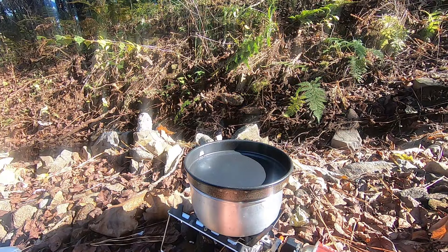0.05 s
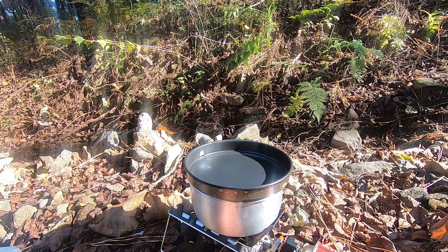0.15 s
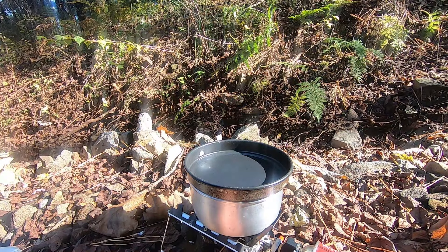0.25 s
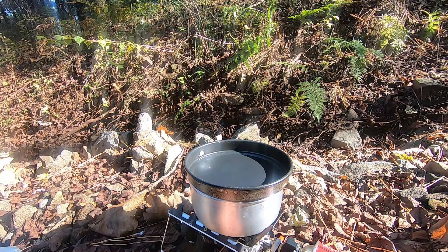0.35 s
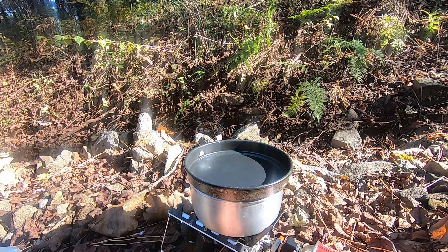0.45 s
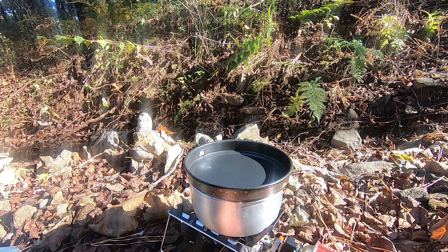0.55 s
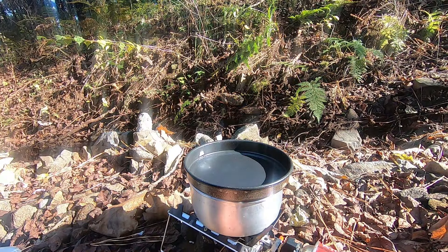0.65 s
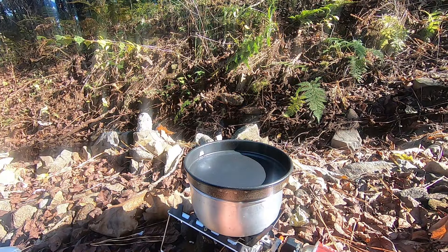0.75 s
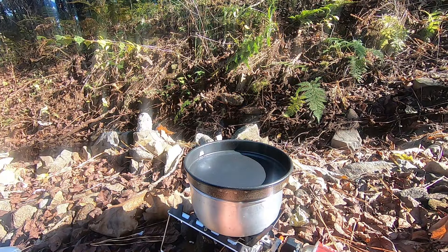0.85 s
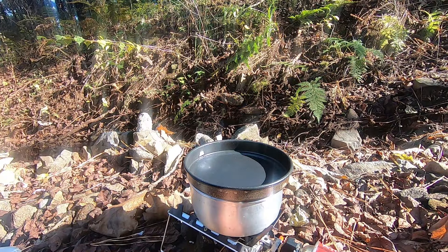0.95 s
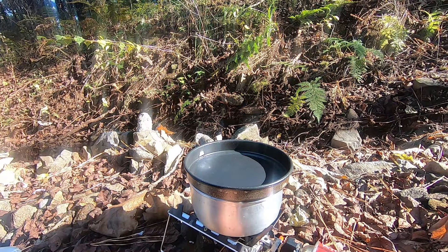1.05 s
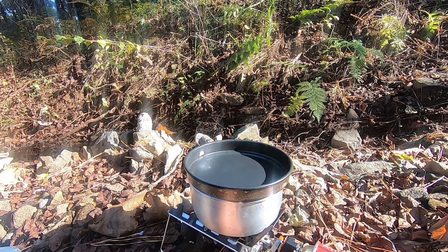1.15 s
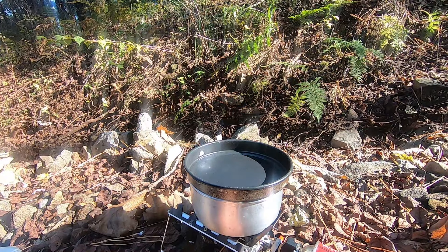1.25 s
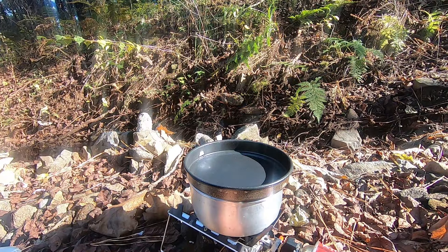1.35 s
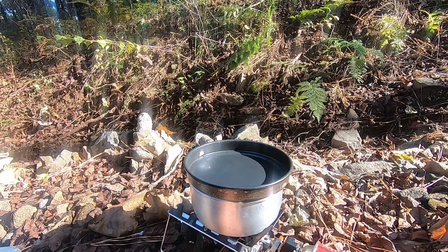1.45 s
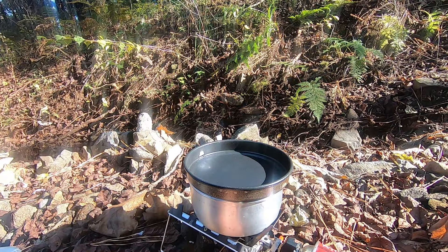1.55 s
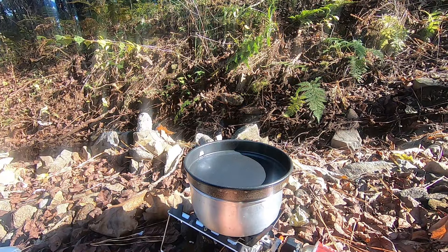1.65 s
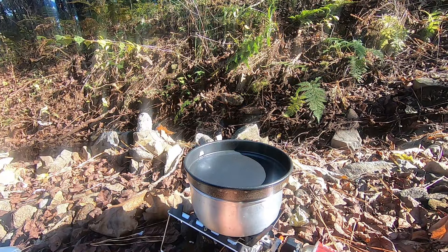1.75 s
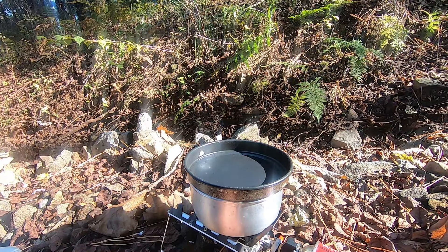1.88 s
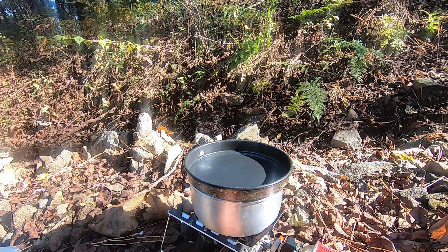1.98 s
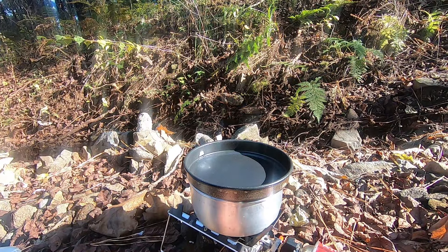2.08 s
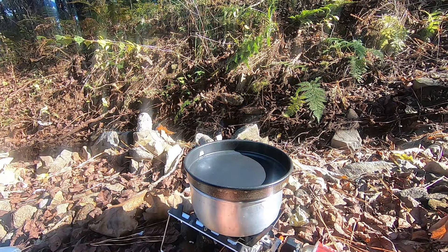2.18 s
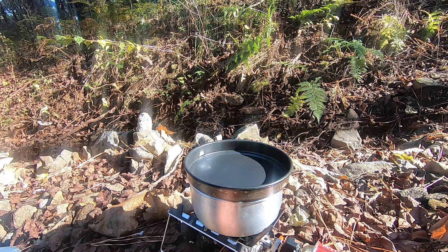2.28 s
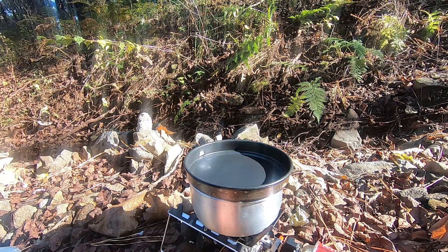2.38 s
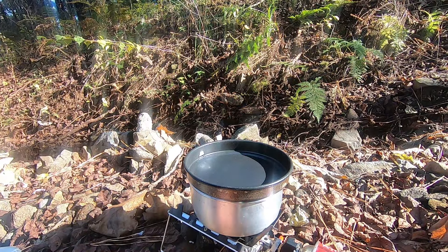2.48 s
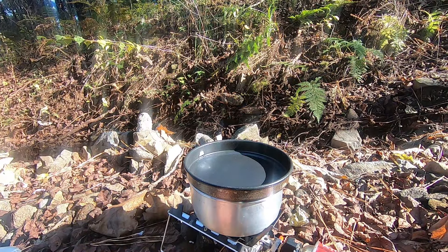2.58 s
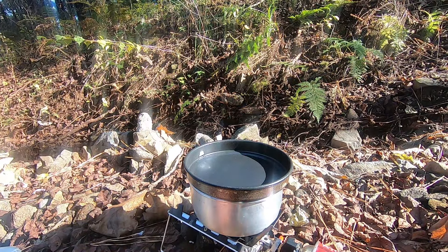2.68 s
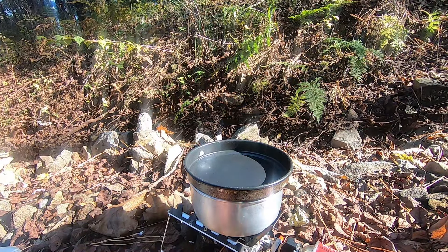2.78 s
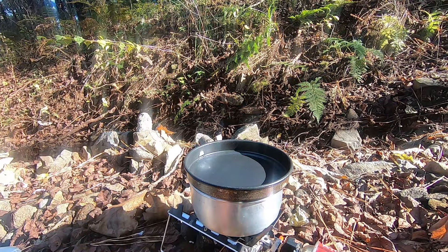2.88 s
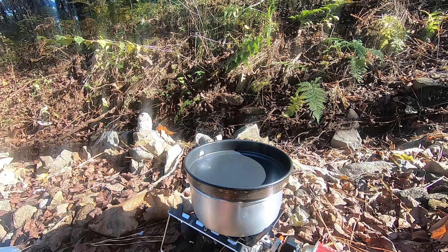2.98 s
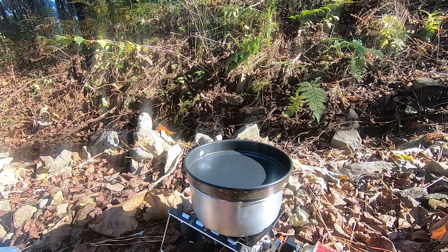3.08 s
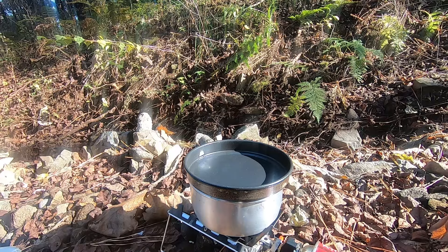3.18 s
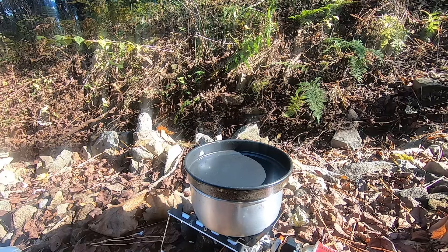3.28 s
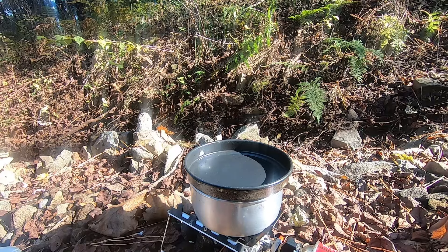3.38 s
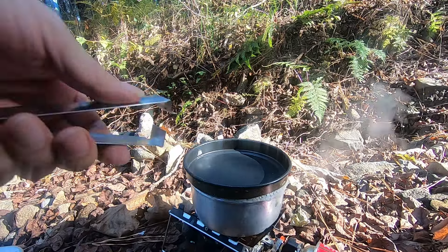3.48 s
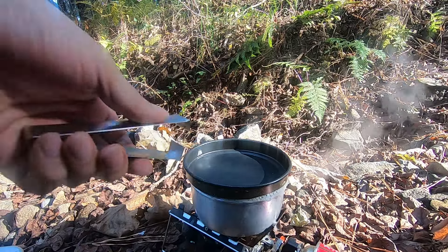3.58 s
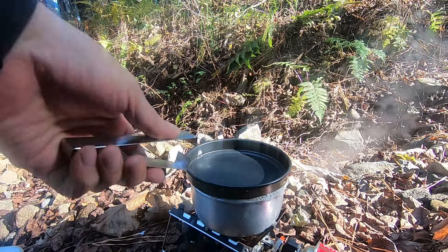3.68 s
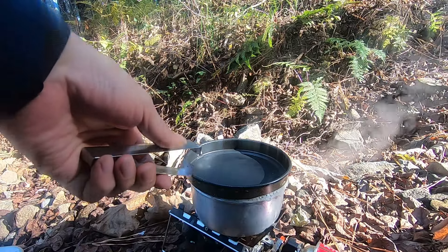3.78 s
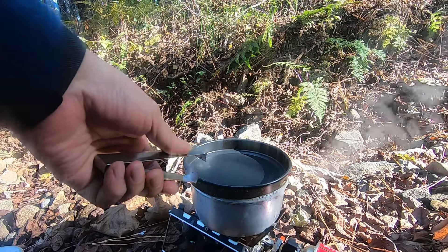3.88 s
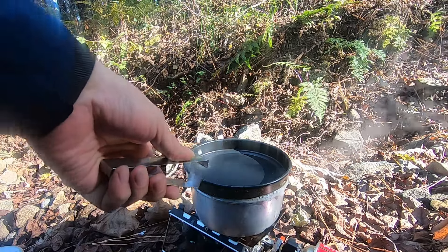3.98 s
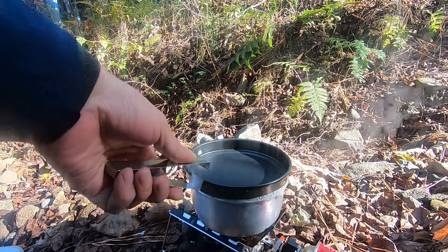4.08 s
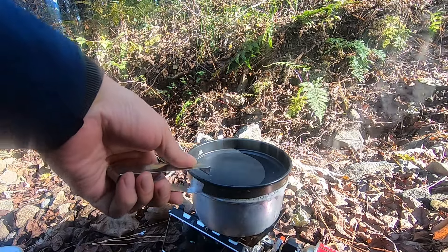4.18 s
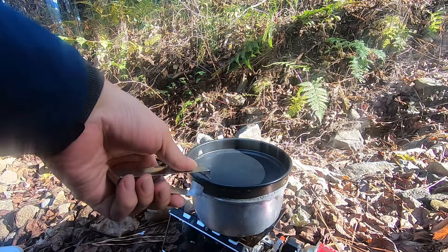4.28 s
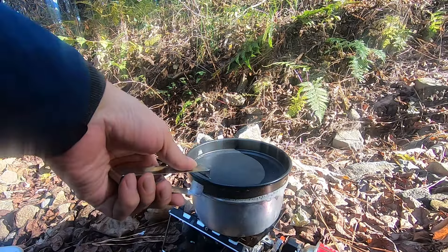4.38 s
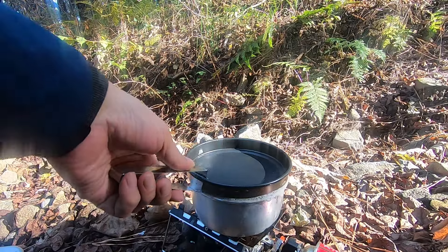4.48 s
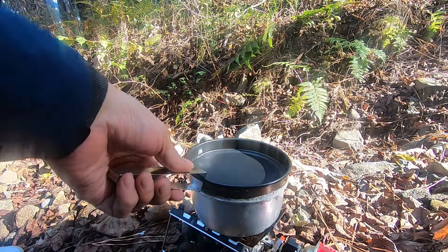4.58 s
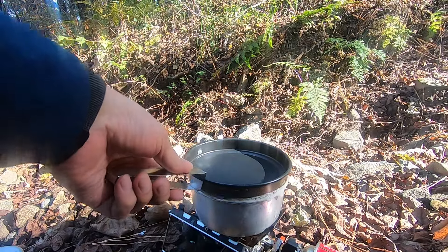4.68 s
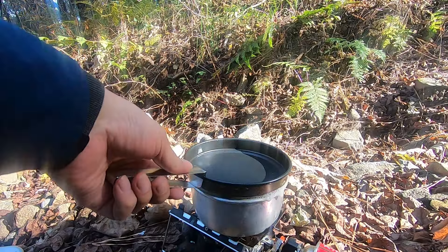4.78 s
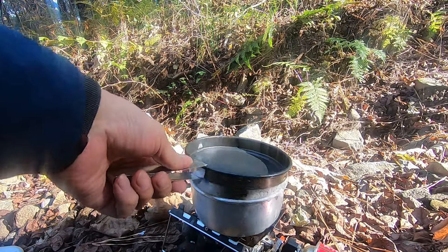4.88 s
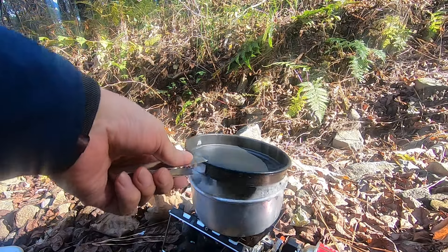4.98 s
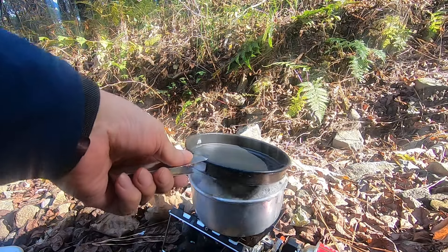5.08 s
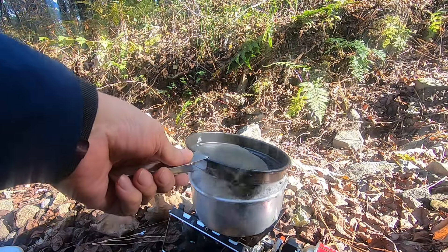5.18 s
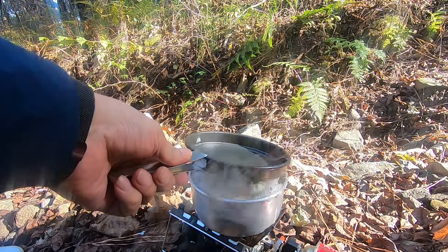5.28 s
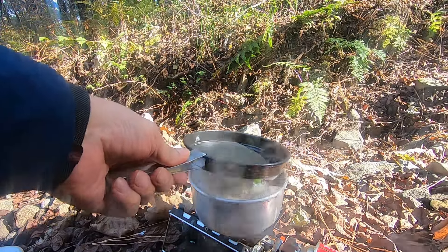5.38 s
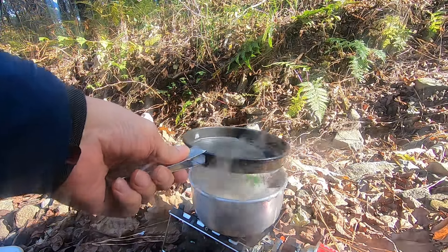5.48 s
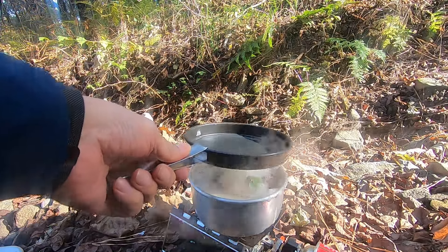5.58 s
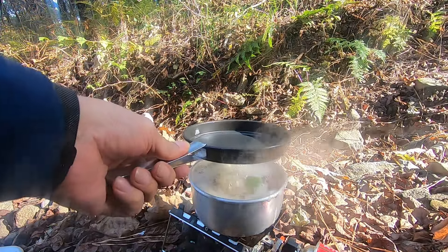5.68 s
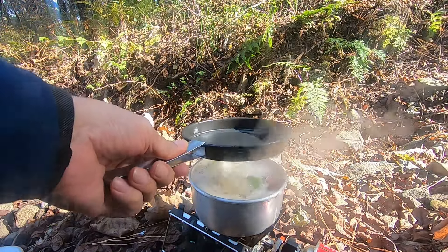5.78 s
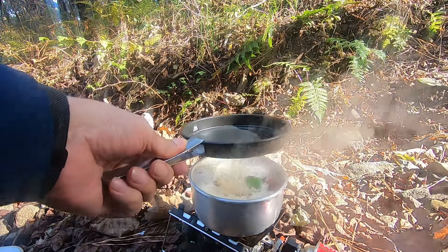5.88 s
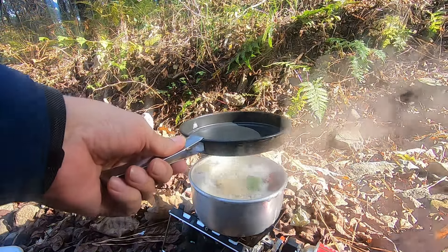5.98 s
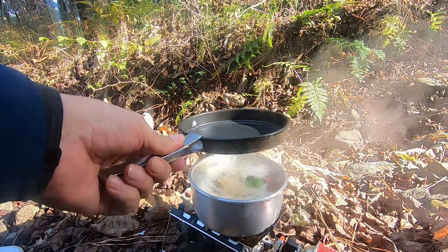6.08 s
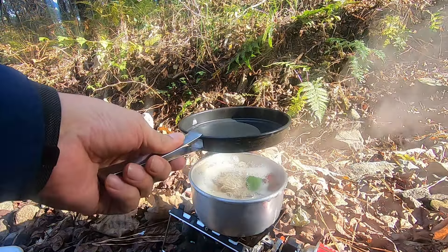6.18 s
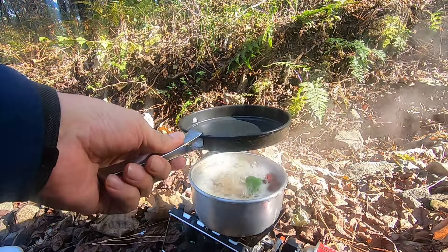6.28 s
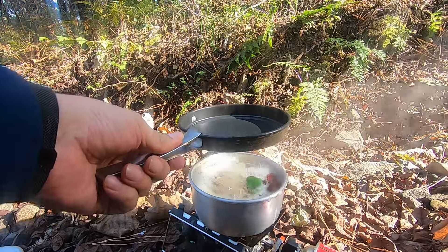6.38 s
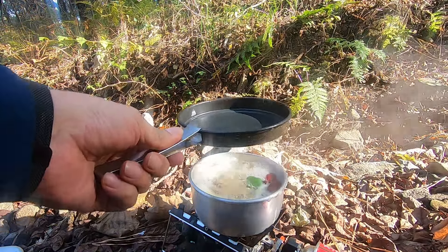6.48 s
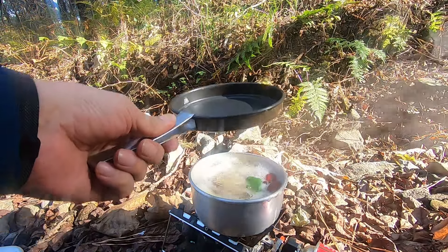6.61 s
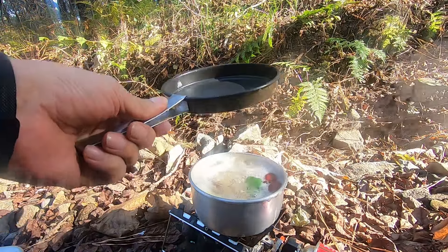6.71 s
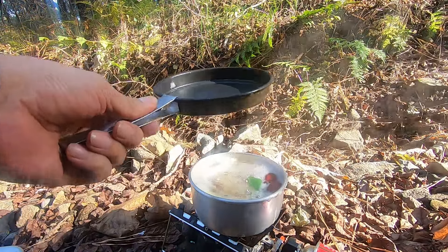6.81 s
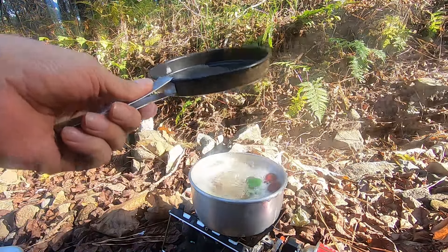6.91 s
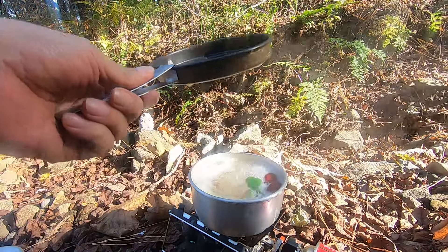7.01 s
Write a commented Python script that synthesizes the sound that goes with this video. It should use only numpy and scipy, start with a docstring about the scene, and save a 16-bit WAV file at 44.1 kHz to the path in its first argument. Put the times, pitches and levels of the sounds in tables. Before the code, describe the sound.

A portable gas stove burns close to the microphone in dry open air. From 0 to 0.4 s a low, throbbing flame roar sits under faint crackly rustling and small metallic ticks; at about 0.3 and 0.4 s a far bird gives two short rising whistles with a weak echo. Around 1.05 s the gas is opened: bright valve hiss, then by 1.5 s a fuller rushing roar with airy, wide hiss and a thin ringing near 3 kHz. A narrow hiss swells at 3 s. At 3.45 s it falls nearly silent for a tenth of a second, then returns with sizzling, rumbling boil and scratchy metal ticks. A gripper clinks at 4.5 s, the lid knocks at 4.8 and 4.9 s, and steam hisses out. From 5.15 s thick bubbles plop rapidly, wet and hollow, continuing over the burner until 7 s.

```python
"""A portable gas stove burns under a covered pot of soup on a forest floor: filtered flow noise
makes the roar and rush of its flame, the ringing mixing tube and a gas jet that hisses on the right.
A far bird whistles in gliding sines, and the flame is turned up. After a short near-silence the soup
boils in random clicks, a gripper clamps and lifts the lid, whose modes ring, and thick bubbles plop
as short rising sines. Tabled levels are relative: gains and filters further on still act on them."""
import sys
import numpy as np
from scipy import signal
from scipy.fft import rfft, irfft, next_fast_len
from scipy.io import wavfile

SR = 44100
rng = np.random.default_rng(int(sys.argv[2]) if len(sys.argv) > 2 else 0)


def wav_out(sig):
    """Save sig, one row per channel (or a flat mono array), as 16-bit PCM at SR to the path in sys.argv[1]."""
    wavfile.write(sys.argv[1], SR, np.round(np.clip(np.atleast_2d(sig).T, -1, 1) * 32767).astype(np.int16))


N = 310905


def from_db(db):
    """Level law: decibels to amplitude gain."""
    return 10 ** (np.asarray(db) / 20)


def rms_one(x):
    """Normalisation: scale to unit mean power."""
    return x / np.sqrt(np.mean(x ** 2) + 1e-20)


def in_time(rows):
    """Linear interpolation: each column of a time curve at every sample."""
    s, *columns = np.transpose(rows)
    return [np.interp(np.arange(N) / SR, s, c) for c in columns]


def on_bins(points):
    """Logarithmic frequency scale: a table interpolated at every spectral bin."""
    hz, value = np.transpose(points)
    bins = np.fft.rfftfreq(next_fast_len(N), 1 / SR)
    return np.interp(np.log(bins + 1), np.log(hz), value)


def colour(x, spectrum):
    """Spectral shaping: filter by a table of levels, then scale to unit power."""
    size = next_fast_len(N)
    return rms_one(irfft(rfft(x, size) * from_db(on_bins(spectrum)), size)[..., :N])


# likeness of the two sides: frequency_hz, coherence (-1 to 1)
COHERENCE = [(30, 0.88), (170, 1), (480, 0.92), (800, 0.77), (1100, 0.48), (1900, 0.79), (2400, 0.74),
             (2900, 0.77), (3130, -0.13), (3280, -0.093), (3520, 0.94), (4300, .8), (5000, 0.5),
             (14000, .2)]
# the right side faces the burner: frequency_hz, level_over_left_db
RIGHT_LIFT = [(200, -1.5), (450, -1.8), (1200, 5.5), (2500, 3.5), (3200, 0), (8000, -11)]


def spread(pair):
    """Interaural coherence: mix two unrelated signals so that left and right agree by frequency."""
    size, alike = next_fast_len(N), on_bins(COHERENCE)
    mid, side = rfft(pair, size) * np.sqrt([1 + alike, 1 - alike])
    left = mid + side
    right = (mid - side) * from_db(on_bins(RIGHT_LIFT))
    return irfft([left, right], size)[:, :N]


def drift(corner_hz):
    """Random modulation: low-passed noise with standard deviation 1, drawn at every 40th sample."""
    r = np.exp(-2 * np.pi * corner_hz * 40 / SR)
    noise = rng.standard_normal(N // 40 + 2002)
    slow = signal.lfilter([1], [1, -2 * r, r * r], noise)[2000:]  # without the settling time
    return np.interp(np.arange(N) / 40, np.arange(len(slow)), rms_one(slow))


def resonate(x, hz, width_hz):
    """Damped resonator: a two-pole band-pass with gain 1 at its peak."""
    r = np.exp(-np.pi * width_hz / SR)
    zeros = np.array([1, 0, -1]) * (1 - r * r) / 2
    poles = [1, -2 * r * np.cos(2 * np.pi * hz / SR), r * r]
    return signal.lfilter(zeros, poles, x + 1e-18)


def shape(x, modes):
    """Parallel resonance: boost the modes and cut the notches in turn."""
    for hz, width_hz, db in modes:
        x = x + (from_db(db) - 1) * resonate(x, hz, width_hz)
    return x


def ring(t, hz, t60):
    """Free vibration: an exponentially decaying sine that starts at t = 0."""
    t = np.maximum(t, 0)
    return np.sin(2 * np.pi * hz * t) * from_db(-60 * t / t60)


def add(out, s, sound):
    """Superposition: mix a short sound in at time s."""
    start = int(s * SR)
    out[..., start:start + sound.shape[-1]] += sound[..., :N - start]


def turbulence(spectrum, flutter_db, flutter_hz):
    """Turbulent flow noise: coloured stereo noise whose level flutters at random."""
    return colour(spread(rng.standard_normal((2, N))), spectrum) * from_db(flutter_db * drift(flutter_hz))


def grains(per_s, size_db):
    """Shot noise: clicks at random instants, of random size and sign on each side."""
    sizes = from_db(size_db * np.minimum(rng.exponential(1, N), 5))
    return (rng.random(N) < per_s / SR) * sizes * rng.standard_normal((2, N))


def swells(rows):
    """Gaussian envelopes: the summed gain of bell-shaped swells at every sample."""
    t = np.arange(N) / SR
    return sum(from_db(db) * np.exp(-((t - s) / half_s) ** 2) for s, half_s, db in rows)


# faint moving air: frequency_hz, density_db
BREEZE_COLOUR = [(20, -2), (70, 2), (130, -8.5), (400, -30.5), (1500, -63)]


def breeze():
    """Incoherent wind noise: lumps of low noise, unrelated on the two sides."""
    level_db = -82.5 + 5.4 * drift(5)
    return from_db(level_db) * colour(rng.standard_normal((2, N)), BREEZE_COLOUR)


# two whistled notes: start_s, length_s, pitch_hz, level_db
BIRD_NOTES = [(0.302, 0.054, 2462, -63), (0.402, .094, 2545, -63.5)]
ATTACK_S, RELEASE_T60_S, RISE_HZ_PER_S, WAVER_DB = 0.016, 0.05, 480, 1.5
ECHO_DELAY_S, ECHO_DB = 0.108, -6


def bird():
    """Frequency modulation: each note glides up and wavers; one weaker echo wavers on its own."""
    out, t = np.zeros(N), np.arange(N) / SR
    for s, length_s, hz, db in BIRD_NOTES:
        pitch = hz + RISE_HZ_PER_S * np.minimum(t, length_s) + 9 * drift(51)
        attack = np.minimum(t / ATTACK_S, 1)
        release = from_db(-60 * np.maximum(t - length_s, 0) / RELEASE_T60_S)
        note = attack * release * np.sqrt(2) * np.sin(2 * np.pi * np.cumsum(pitch) / SR)
        add(out, s, note * from_db(db + WAVER_DB * drift(45)))
        add(out, s + ECHO_DELAY_S, note * from_db(db + ECHO_DB + WAVER_DB * drift(45)))
    return out


# the rustle swells a little and dies away: time_s, level_db
RUSTLE = [(0, -66), (.11, -61.5), (.22, -60), (.3, -71), (.4, -110)]
# its spectrum: frequency_hz, density_db
RUSTLE_COLOUR = [(500, -11), (900, -5), (1500, -2), (3000, 1), (4800, -1.5), (7000, -26), (10000, -43.5)]


def rustle():
    """Shot noise: dense dry crackles at the start."""
    return from_db(in_time(RUSTLE)[0]) * colour(spread(grains(per_s=1500, size_db=0.0)), RUSTLE_COLOUR)


# metal and spitting water: start_s, level_db, pitch_hz, bandwidth_octaves (scales both edges), rasp_t60_s
TICKS = [(0.012, -44, 3050, 0.48, 0.024), (0.078, -47, 1900, .65, .022), (0.107, -44, 2800, 0.28, 0.016),
         (0.128, -46, 3517, 0.7, .016), (0.157, -46, 2950, 0.25, .025), (0.217, -50, 3300, 0.97, .02),
         (0.36, -49, 4800, 0.2, 0.014), (0.376, -53, 4700, .4, .015), (0.506, -41, 2700, 1.8, 0.007),
         (0.7859, -41, 4100, 0.48, .009), (3.595, -27.5, 2260, 0.58, 0.026), (3.62, -30, 2300, 1.1, .03),
         (3.665, -31, 3000, .8, .02), (3.745, -29.5, 3600, .9, .025), (3.7883, -30.5, 3135, 0.83, 0.047),
         (3.8295, -26.5, 2750, 1.1, 0.012), (4.0268, -31, 3170, 1.04, 0.029),
         (4.1623, -33, 2200, 0.54, 0.029), (4.796, -29, 1520, 0.35, 0.008),
         (4.8972, -25.5, 3000, 0.83, 0.0052), (4.9207, -32, 2380, 0.92, 0.027),
         (4.93, -31, 3470, .7, 0.011), (5.318, -38, 2500, 0.51, .02), (5.4801, -31.5, 2280, 1.1, 0.013),
         (5.624, -34, 2400, 0.31, .025), (5.6854, -30, 2100, 0.78, 0.012), (6.319, -42, 2400, .35, .025),
         (6.686, -42, 2100, 0.43, .015), (6.8368, -35, 2100, 0.42, .012), (6.955, -39.5, 2500, 0.81, .012),
         (6.962, -37, 2100, 0.38, .006)]


def ticks():
    """Impulse response: a crack and a short rasp excite a band around each tick's own pitch."""
    out, t = np.zeros(N), np.arange(SR // 20) / SR
    for s, db, hz, octaves, t60 in TICKS:
        edges = hz * 2 ** (octaves * np.array([-1.3, 0.9]))
        crack = t == 0
        rasp = 0.35 * rng.standard_normal(len(t)) * from_db(-60 * t / t60)
        burst = signal.sosfilt(signal.butter(2, edges, "band", fs=SR, output="sos"), crack + rasp)
        add(out, s, from_db(db + 18.0) * burst / np.linalg.norm(burst))
    return signal.sosfilt(signal.butter(4, 4700, fs=SR, output="sos"), out)


# drops on the hot burner: start_s, level_db
SPITS = [(3.746, -42), (3.968, -43), (4.481, -43), (5.372, -42.5), (6.353, -38)]


def spits():
    """Flash evaporation: a droplet turns to steam in a decaying puff of band-passed noise."""
    out, t = np.zeros(N), np.arange(SR // 20) / SR
    t60_s, band_hz = 0.021, [2300, 7100]
    for s, db in SPITS:
        add(out, s, from_db(db - 60 * t / t60_s) * rng.standard_normal(len(t)))
    return signal.sosfilt(signal.butter(2, band_hz, "band", fs=SR, output="sos"), out)


# modes of the gripper's jaws: frequency_hz, level_db, t60_s
GRIPPER_MODES = [(2708, 2, 0.066), (4011, 2.5, 0.1), (5286, -12, .09), (6500, -9.5, 0.089),
                 (7400, -14, .08)]
CLINK_S, CLINK_DB = 4.541, -38
# modes of the lid: frequency_hz, level_db, t60_s
LID_MODES = [(175, 4.5, 0.072), (340, -6.5, 0.05), (467, -9, 0.035), (590, -12, 0.02), (722, -3.5, 0.12),
             (1060, -11, 0.06), (1190, -6.5, 0.025), (1720, -5, 0.016), (2032, -9, 0.058),
             (2280, -7.5, 0.017), (2900, -14, 0.08), (3140, -15, 0.08), (3540, -12, 0.03),
             (4100, -12, 0.014)]
# knocks and taps on the pot: start_s, level_db, contact_low_hz, contact_high_hz
KNOCKS = [(4.7958, -21, 40, 3000), (4.8972, -22.5, 1410, 7000), (4.93, -30, 2500, 7000),
          (5.001, -33, 800, 3000), (5.48, -33, 1100, 6000), (5.6852, -36, 500, 4000)]


def lid():
    """Modal synthesis: the gripper clinks, then each knock excites the lid's modes within its band."""
    out, t = np.zeros(N), np.arange(SR // 3) / SR
    clink = sum(from_db(CLINK_DB + db) * ring(t, hz, t60) for hz, db, t60 in GRIPPER_MODES)
    add(out, CLINK_S, clink)
    # neighbouring modes have opposite signs
    body = sum((-1) ** k * from_db(db) * ring(t, hz, t60) for k, (hz, db, t60) in enumerate(LID_MODES))
    for s, db, low_hz, high_hz in KNOCKS:
        contact = signal.butter(2, [low_hz, high_hz], "band", fs=SR, output="sos")
        add(out, s, from_db(db) * signal.sosfilt(contact, body))
    return out


# steam let out as the lid comes loose: time_s, level_db
STEAM = [(4.7, -85), (4.9, -53), (5.05, -55), (5.25, -66), (5.42, -52), (5.6, -58), (5.85, -61), (6.2, -72),
         (6.6, -85)]
# its spectrum: frequency_hz, density_db
STEAM_COLOUR = [(2800, -35), (3400, -14), (3600, -2), (4150, -1), (4350, -2.5), (4600, 3.5), (4720, -2),
                (4850, -27), (8000, -45)]


def steam():
    """Jet noise: steam rushes out through the gap under the lid."""
    return from_db(in_time(STEAM)[0]) * turbulence(STEAM_COLOUR, flutter_db=2.0, flutter_hz=25)


# the boil, also played by sizzle(): time_s, sizzle_db, small_bubbles_db, rumble_db
BOIL = [(3.5, -81.5, -84.5, -83), (3.6, -47, -63, -55), (3.95, -46, -64, -44), (4.6, -50.5, -52, -43.5),
        (4.95, -48, -51, -45.5), (5.2, -52.5, -55.5, -48), (5.7, -51.5, -53.5, -43),
        (6.2, -61.5, -59.5, -51.5), (7.05, -65, -56.5, -50.5)]


def simmer(count=16):
    """Bubble resonance: small bubbles of many sizes each ring for a few cycles in the thick soup."""
    clicks, dealt = grains(per_s=330, size_db=0.5), rng.integers(0, count, N)
    pitches = np.geomspace(310, 1600, count)
    rings = sum(resonate(clicks * (dealt == k), hz, hz / 9) for k, hz in enumerate(pitches))
    return from_db(in_time(BOIL)[1] + 1.5) * rms_one(spread(rings))


# sizzle on the pot's floor: frequency_hz, density_db
SIZZLE_COLOUR = [(80, -49), (600, 6), (1200, -20.5), (1550, -6), (1850, -1), (2200, 3.5), (2900, 0),
                 (3900, 1.5), (4600, 0), (4850, -4), (5250, -5), (5700, -9), (7200, -14), (8100, -21),
                 (11200, -29), (16000, -58)]
# low spectrum shared by the soup's rumble and the flame's roar: frequency_hz, density_db
ROAR_COLOUR = [(20, -49), (55, -29), (90, -22), (116, -28.5), (132, -13.5), (150, -0.5), (175, 0),
               (210, -1), (250, -8.5), (330, -10.5), (400, -21.5), (560, -25.5), (730, -18), (1050, -60.5)]


def sizzle():
    """Vapour collapse: thousands of clicks a second coloured by the pot, over the soup's rumble."""
    sizzle_db, _, rumble_db = in_time(BOIL)
    collapses = from_db(sizzle_db + 3.0) * colour(spread(grains(per_s=7000, size_db=0.2)), SIZZLE_COLOUR)
    return collapses + from_db(rumble_db) * turbulence(ROAR_COLOUR, flutter_db=3.0, flutter_hz=14.0)


def lesser_plops():
    """Jittered point process: rows like those of the big bubbles, at uneven intervals."""
    per_s, level_spread_db = 9, 1
    slots = np.arange(5.15, N / SR - 1 / per_s, 1 / per_s)  # once the lid is loose
    rows = []
    for s in slots:
        start_s = s + rng.random() / per_s
        pop_db, thump_db = rng.normal(-38, level_spread_db), rng.normal(-47, level_spread_db)
        rows.append((start_s, pop_db, thump_db, 1010 * 2 ** rng.uniform(-0.59, 0.35)))
    return rows


# the biggest bubbles, played by plops(): start_s, pop_db, thump_db, starting_pitch_hz
BIG_PLOPS = [(4.162, -35, -26.5, 690), (4.187, -41, -27, 873), (4.478, -37, -34, 800),
             (4.56, -36, -33, 724.6), (4.932, -47, -31, 785), (4.969, -45.5, -29, 710),
             (5.004, -34, -49, 890), (5.156, -35, -36, 790), (5.161, -37, -40, 784),
             (5.202, -31, -41, 1070), (5.214, -36, -34, 1240), (5.295, -37, -32, 1070),
             (5.484, -38, -33, 1210), (5.494, -33, -37, 1090), (5.539, -33, -34, 880),
             (5.5625, -31, -37, 1150), (5.586, -33.5, -44, 746), (5.622, -32, -54, 800),
             (5.6405, -32, -28, 1090), (5.659, -37, -36, 1050), (5.6855, -30, -39, 600),
             (5.735, -47, -32, 900), (5.785, -38, -29, 1100), (5.805, -35, -46, 900),
             (5.813, -33, -29.5, 1130), (5.835, -33, -43, 1100), (5.9295, -32, -31.5, 1100),
             (5.962, -33, -45, 1250), (6.069, -41, -56, 602), (6.074, -35, -48, 1230),
             (6.078, -32, -28, 1020), (6.152, -39, -40, 850), (6.198, -35, -33, 700),
             (6.255, -42, -41, 1032), (6.266, -34, -38, 1150), (6.312, -32.5, -39, 1060),
             (6.3215, -29.5, -34, 1350), (6.3825, -36.5, -43, 1390), (6.393, -39, -44, 1400),
             (6.4445, -33.5, -29.5, 990), (6.464, -36, -31, 1230), (6.473, -32, -36, 1010),
             (6.482, -39, -36, 1030), (6.638, -37, -35, 960), (6.653, -40, -42, 1150),
             (6.68, -42, -40, 836), (6.709, -43, -38, 1090), (6.789, -42, -44, 950),
             (6.811, -38, -33, 1300), (6.8245, -32, -28, 800), (6.834, -36, -35, 900),
             (6.869, -34, -38, 835), (6.9165, -29.5, -46, 1630), (6.922, -34, -40, 1150),
             (6.962, -25, -37, 1580), (6.973, -33, -39, 1450), (6.9835, -33, -30.5, 725),
             (7.009, -42, -46, 1400)]
RING_CYCLES, RISE_PER_S = 22, 7.6  # cycles to fall 60 dB; share of the starting pitch gained per s
SNAP_HZ, SNAP_T60_S, DROP_HZ = 1300, 0.0028, 1210


def plops(rows, count=3):
    """Bubble acoustics: the skin snaps, a rising ring, hollow and drops follow, and steam thumps."""
    out, t = np.zeros((2, N)), np.arange(SR // 6) / SR
    for s, pop_db, thump_db, hz in rows:
        delay, detune = rng.random((2, count, 1))
        lag_s = 0.00021 * rng.uniform(-1.1, 1)  # between the sides
        at_sides = np.maximum(t - lag_s * np.array([[-0.5], [0.5]]), 0)
        snap = ring(at_sides, SNAP_HZ, SNAP_T60_S)
        blip = ring(at_sides + RISE_PER_S * at_sides ** 2 / 2, hz, RING_CYCLES / hz)
        # the crater rings up to 2.97 ms later
        hollow = ring(t - 0.00297 * rng.random(), 580 * 2 ** (0.364 * rng.standard_normal()), 0.018)
        drops = ring(t - 0.012 * delay, DROP_HZ * 2 ** (0.89 * (detune - 0.5)), 0.0058).sum(axis=0)
        thump = ring(t, 188 * 2 ** (0.12 * rng.standard_normal()), 0.045)
        pop = 0.7 * snap + blip + 0.77 * hollow + 0.77 * drops
        add(out, s, from_db(pop_db + 0.5) * pop + from_db(thump_db + 6.0) * thump)
    # the thick soup lets little treble through
    return signal.sosfilt(signal.butter(4, 2100, fs=SR, output="sos"), out)


# the valve while it is turned up: time_s, level_db
VALVE = [(1.02, -78), (1.06, -63), (1.2, -64), (1.35, -61), (1.55, -67), (1.9, -86)]
# its spectrum: frequency_hz, density_db
VALVE_COLOUR = [(2000, -33), (2750, 5), (4650, 3), (5100, -31)]


def valve():
    """Throttled flow noise: a band of bright hiss as the gas is opened."""
    return from_db(in_time(VALVE)[0]) * turbulence(VALVE_COLOUR, flutter_db=0.2, flutter_hz=30)


# gas at the ports: frequency_hz, density_db
HISS_COLOUR = [(80, -54), (500, 4), (1500, -3), (2400, -0.5), (2900, 4.5), (3600, 0), (4400, -1),
               (5600, -8.5), (6900, -5.5), (8000, -19), (10500, -20), (11600, -46), (16000, -48)]
# the jet opens with the flame: time_s, hiss_db, resonances_db
JET = [(0, -75, -94), (1.05, -72.5, -69), (1.5, -58.5, -57.5), (2.05, -59.5, -58.5), (3.44, -54.5, -57),
       (4.5, -46.5, -51), (5.5, -50.5, -47), (6, -53.5, -58), (7.05, -50.5, -66)]
# its spectrum: frequency_hz, density_db
JET_COLOUR = [(200, -44), (2000, -5), (5500, -10.5), (6500, -10), (7000, -12), (8100, -10), (9000, 3.5),
              (9700, -5.5), (10700, -13), (11300, -26.5), (12500, -18.5), (16000, -26.5)]
# its resonances: frequency_hz, width_hz (before widening), level_db
JET_MODES = [(6490, 270, -1.5), (6690, 220, -10.5), (8720, 290, -3), (9300, 206, 4.5)]
# swells of the mixing tube: centre_s, half_length_s, peak_db
TUBE_SWELLS = [(1.38, 0.33, -59), (2.7, 0.99, -68.5), (4.08, 0.39, -55), (6, 0.25, -59), (6.7, 0.4, -69)]
TUBE_HZ, TUBE_WIDTH_HZ, TUBE_DB = 3200, 216, -67.5  # the tube always rings a little
# swells of a narrow hiss on the left: centre_s, half_length_s, peak_db
SIDE_SWELLS = [(2.98, 0.21, -51.5), (3.44, 0.16, -56.5), (6.9, 0.99, -69)]


def gas():
    """Forced resonance: port hiss, a tube rung by noise, a jet on the right, a narrow hiss on the left."""
    jet_db, ringing_db = in_time(JET)
    ports = from_db(in_time(FLAME)[1]) * turbulence(HISS_COLOUR, flutter_db=1.03, flutter_hz=42)
    tube = resonate(spread(rng.standard_normal((2, N))), TUBE_HZ, TUBE_WIDTH_HZ)
    tube = rms_one(resonate(tube, TUBE_HZ, TUBE_WIDTH_HZ))
    tube = (from_db(TUBE_DB) + swells(TUBE_SWELLS)) * tube
    ringing = np.zeros((2, N))
    for hz, width, db in JET_MODES:
        mode = resonate(rng.standard_normal((2, N)), hz, 1.3 * width)
        ringing += from_db(db) * resonate(mode, hz, 1.3 * width)
    jet = from_db(jet_db) * colour(rng.standard_normal((2, N)), JET_COLOUR)
    jet = jet + from_db(ringing_db) * rms_one(ringing)
    narrow = rms_one(resonate(resonate(rng.standard_normal(N), 4800, 800), 4820, 1000))
    narrow = swells(SIDE_SWELLS) * narrow
    # gains of left and right
    return ports + tube * from_db([[0], [-3]]) + jet * from_db([[-25], [6]]) + narrow * from_db([[1], [-13]])


# the burner idles, then is turned up; gas() plays the hiss: time_s, rush_db, port_hiss_db
FLAME = [(0, -70, -60), (.2, -77, -63), (.32, -83, -64.5), (.98, -72.5, -64.5), (1.08, -60.5, -62),
         (1.2, -59.5, -64), (1.26, -53.5, -60), (1.52, -51, -54), (2.1, -54, -55.5), (2.75, -53.5, -59.5),
         (3.1, -55, -52.5), (3.44, -50.5, -49.5), (3.68, -44, -52), (3.95, -47, -48.5), (4.4, -48, -56),
         (5.7, -46.5, -54.5), (6.1, -49, -52.5), (6.55, -50.5, -56), (7.05, -50.5, -54)]
# rush of the flame: frequency_hz, density_db
RUSH_COLOUR = [(60, -47.5), (200, -11.5), (330, 3), (430, 0), (570, 5), (700, -3.5), (870, -2),
               (1020, -8.5), (1230, -10), (1450, -9.5), (1700, -13), (2300, -11), (5000, -25),
               (12000, -58.5)]
REFERENCE_RUSH_DB, ROAR_DB = -53.5, -48  # the roar has its own level at this rush
ROAR_FOLLOWS = 0.28  # dB of roar per dB of rush
THROB_DEPTH, THROB_HZ = 0.061, 23  # dB of throb per dB off the reference; corner of the throb


def flame():
    """Combustion noise: a low roar that throbs most when the flame is small, under a fluttering rush."""
    rush_db = in_time(FLAME)[0]
    drive_db = rush_db - REFERENCE_RUSH_DB
    roar_db = ROAR_DB + drive_db * (ROAR_FOLLOWS + THROB_DEPTH * drift(THROB_HZ))
    roar = from_db(roar_db) * turbulence(ROAR_COLOUR, flutter_db=0.85, flutter_hz=9.2)
    rush = from_db(rush_db + 1.58) * turbulence(RUSH_COLOUR, flutter_db=1.5, flutter_hz=40)
    return roar + rush


# resonances and notches between burner and pot: frequency_hz, width_hz, boost_db
GAP_MODES = [(1180, 120, 0.5), (1450, 174, 4), (1650, 86, -2.5), (2200, 1200, 2), (2770, 120, 2),
             (2970, 55, -2), (3160, 160, 2.5), (3370, 110, -3.5), (3624, 290, 3.5), (4090, 290, 3.5),
             (4400, 90, -3), (4550, 150, 3), (5280, 210, 3), (5670, 180, -3.5), (5840, 190, 5),
             (6200, 130, -1.5), (6500, 110, 3.5), (6830, 160, 4), (7060, 180, -5), (7380, 500, 5.5),
             (8500, 180, -2), (8970, 130, -1.5), (9700, 210, -4)]
# those added with the lid held above the open pot: frequency_hz, width_hz, boost_db
OPEN_MODES = [(505, 160, 2.5), (1150, 180, 3), (1610, 120, 5), (1840, 180, -11), (2140, 330, 2.5),
              (2830, 200, -4.5), (3730, 140, -7), (3830, 140, 3), (5620, 210, 5), (6530, 250, 3),
              (6720, 220, -2), (7100, 230, 5.5), (8860, 300, 2), (9680, 460, 6.5)]
# how far the lid is lifted: time_s, share (0-1)
LID_LIFT = [(5.0, 0), (5.9, 1)]


def gap(x):
    """Cavity resonance: the air gap under the pot colours the sound; lifting the lid adds modes."""
    closed = from_db(-1.0) * shape(x, GAP_MODES)
    return closed + in_time(LID_LIFT)[0] * (shape(closed, OPEN_MODES) - closed)


def scene():
    """Superposition in open air: the small pot, a poor radiator of bass, loses it from its blows."""
    steady = gap(flame() + gas() + valve() + sizzle()) + simmer() + steam()
    blows = lid() + plops(BIG_PLOPS) + plops(lesser_plops())
    pot = signal.sosfilt(signal.ellip(3, 1, 24, 145, "high", fs=SR, output="sos"), blows)
    return steady + pot + ticks() + spits() + rustle() + bird() + breeze()


# stereo width, where 0 is mono: time_s, bass_width (0-1), middle_width (0-1), high_treble_width (0-1)
WIDTH = [(1.25, 0.01, 0, 0.91), (1.5, 0.01, 0.29, 0.7), (2.2, 0.43, 0.96, 0.75), (3.46, 1, 1, 0.86),
         (3.55, 0.01, 0, 0.1), (4.17, 0.01, 0.01, 0.05), (4.4, 0.02, 0, 0.68), (5.83, 0.01, 0, 0.96),
         (6.1, 0.06, 0.4, 1), (6.4, 0.4, 0.61, 1), (7.05, 0.9, 0.91, 1)]
# the level drops nearly to silence and comes back to about half the gain: time_s, gain
FADE = [(3.443, 1), (3.45, 0.039), (3.47, 0.00095), (3.557, 0.001), (3.58, 0.096), (3.62, 0.53)]


def record(dry):
    """Stereo difference: the left lags, its difference to the right opens by band, the top is cut."""
    left, right = np.roll(dry[0], 2), dry[1]  # lag in samples
    size = next_fast_len(N)
    apart = rfft(right - left, size)
    band = np.digitize(np.fft.rfftfreq(size, 1 / SR), [570, 11100])  # band edges in Hz
    # at width 0 the left feeds both sides
    right = left + sum(width * irfft(apart * (band == k), size)[:N] for k, width in enumerate(in_time(WIDTH)))
    pair = np.array([left, right]) * in_time(FADE)[0]
    return signal.sosfilt(signal.ellip(10, 0.1, 80, 15400, fs=SR, output="sos"), pair)


dry = scene()
out = record(dry)
wav_out(out)
```